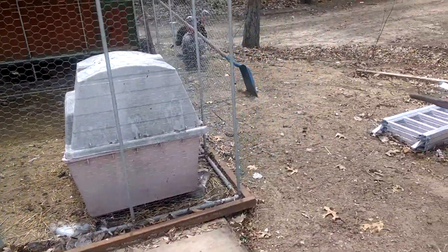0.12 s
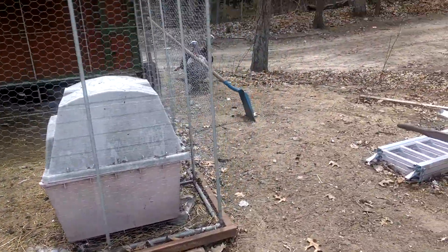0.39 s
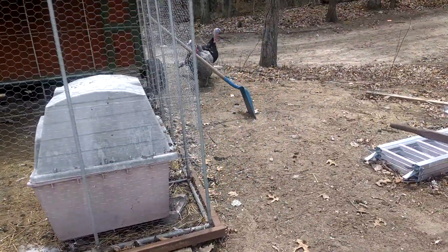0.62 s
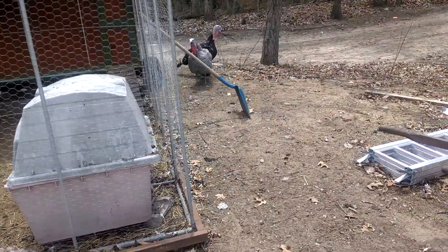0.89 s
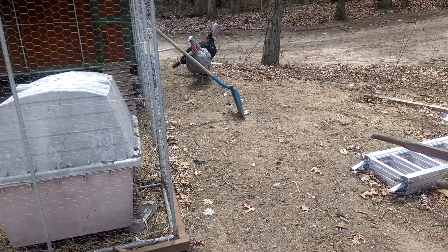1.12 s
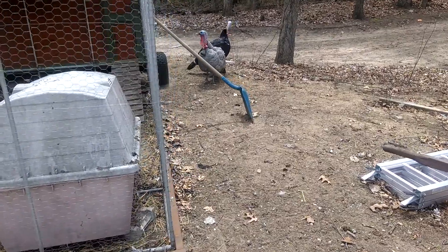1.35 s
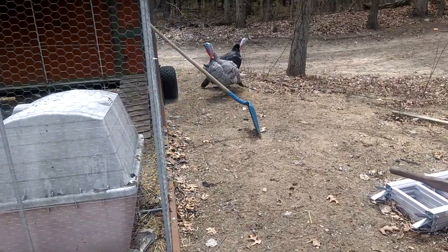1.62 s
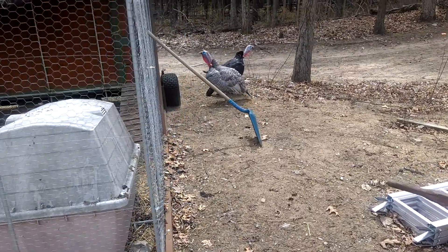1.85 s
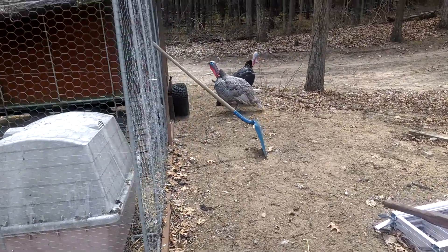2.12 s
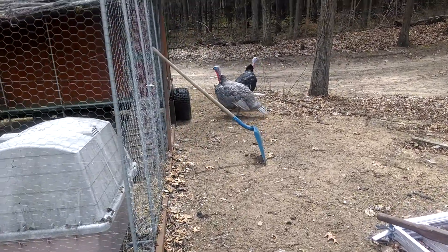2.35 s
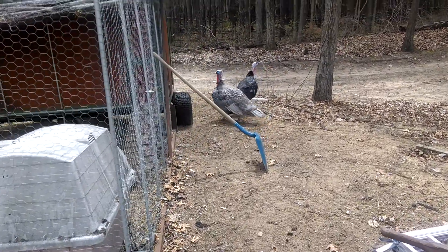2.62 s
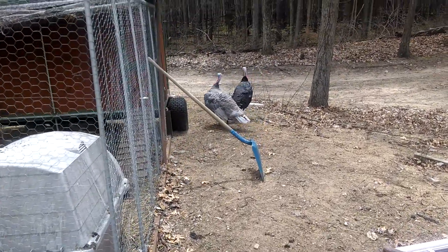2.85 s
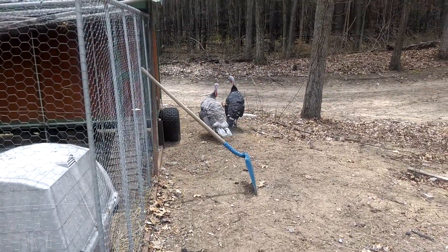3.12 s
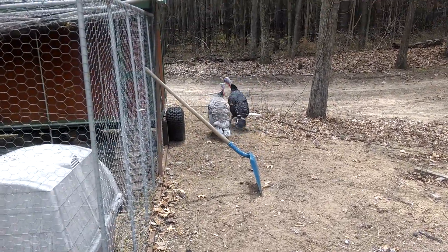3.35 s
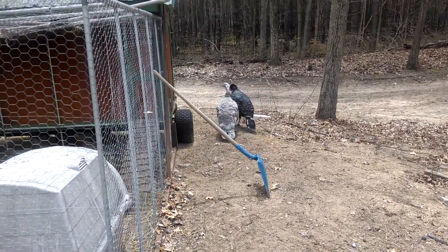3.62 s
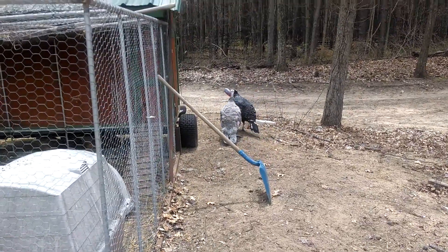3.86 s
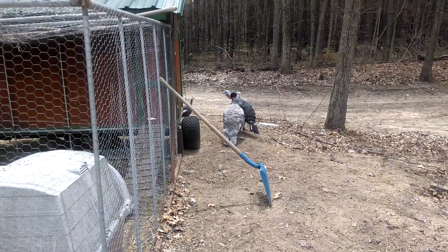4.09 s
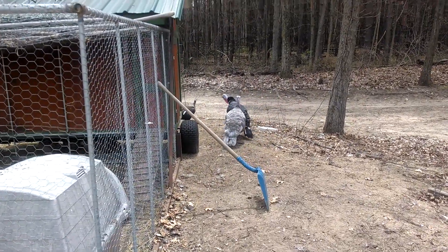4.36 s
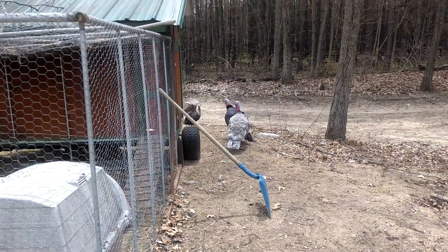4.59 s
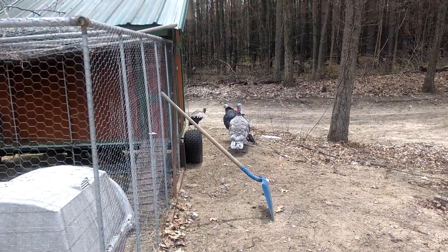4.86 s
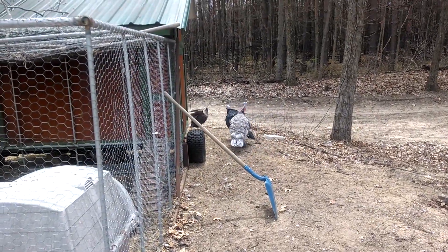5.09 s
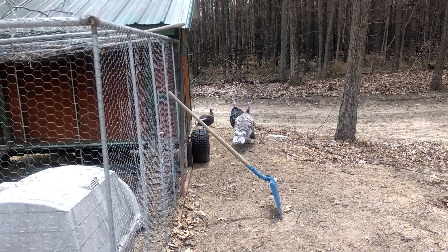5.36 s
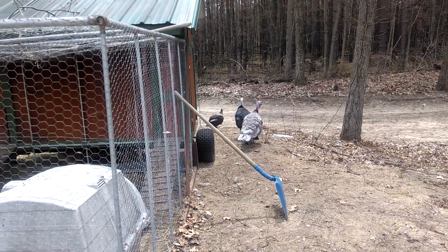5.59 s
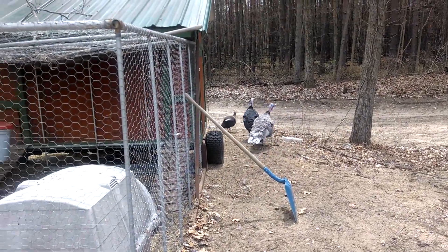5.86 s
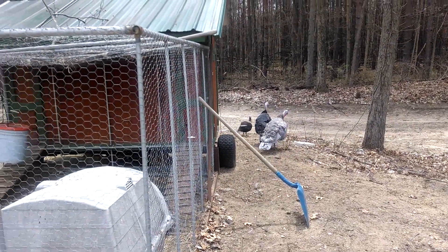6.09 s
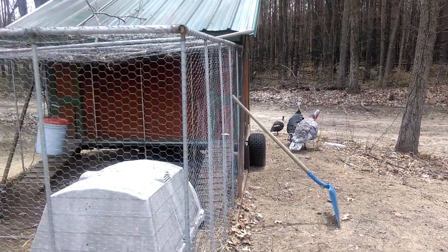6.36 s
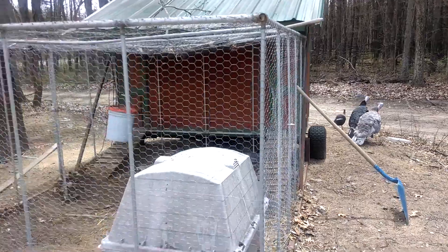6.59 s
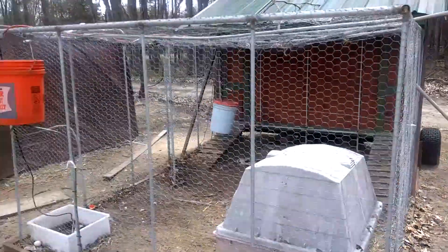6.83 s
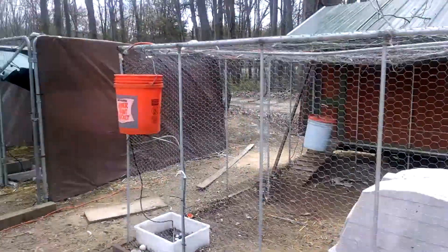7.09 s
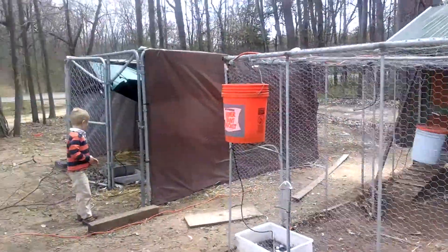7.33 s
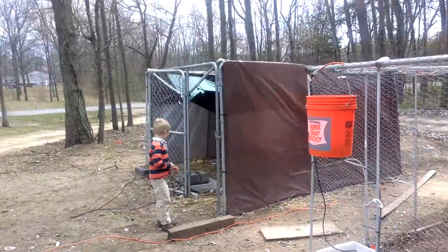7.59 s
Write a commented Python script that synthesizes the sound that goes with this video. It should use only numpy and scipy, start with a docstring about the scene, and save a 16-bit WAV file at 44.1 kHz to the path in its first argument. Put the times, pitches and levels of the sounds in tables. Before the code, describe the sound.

Turkeys burst into rapid, throaty gobbles made of tumbling clucks and rising yelps, repeated with pauses, over soft wind and faint leaf scuffs outdoors.

```python
"""A yard at the edge of a wood, some metres from turkeys, heard through the two microphone ports of a
hand-held camera. Two near birds sing yelps and clucks as gliding overtones with chest tone and breath; a
farther one warbles in quick falling notes. A smaller fowl peeps in falling whistles. Scattered taps echo
the calls. Noise bursts are feet in dry leaves; a treble hiss rustles; low noise is wind on the ports,
single pulses are bumps of air, and a steady bed of coloured noise is the air of the place."""
import sys
import numpy as np
from scipy import signal
from scipy.fft import rfft, irfft, next_fast_len
from scipy.io import wavfile
from scipy.ndimage import uniform_filter1d

SR = 44100
rng = np.random.default_rng(int(sys.argv[2]) if len(sys.argv) > 2 else 0)


def volts_from_db(level):
    """Convert decibel levels to linear amplitude ratios."""
    exponent = np.asarray(level, float) / 20
    return 10 ** exponent


def transcribe(signal):
    """Save signal, clipped to [-1, 1], as a 16-bit WAV file at the path in sys.argv[1]."""
    frames = np.atleast_2d(signal).T
    limited = np.clip(frames, -1, 1)
    pcm = np.round(limited * 32767).astype(np.int16)
    wavfile.write(sys.argv[1], SR, pcm)


N = 340011  # length in samples

# Rising yelps. Each row: start in seconds, length in seconds, effort in dB, first pitch in Hz, last pitch in Hz.
YELP_CALLS = [(0.538, 0.028, -21.5, 626.4, 738.4), (0.575, 0.051, -4.5, 578.2, 878),
              (0.764, 0.094, -7.5, 569.7, 767.5), (1.358, 0.088, -14.5, 564.3, 760),
              (1.678, 0.059, -4, 613, 818), (3.367, 0.04, -21, 654, 771.8), (3.417, 0.11, -10, 573, 776),
              (3.681, 0.06, -15, 585, 705), (3.702, 0.073, -12.5, 530, 755),
              (5.897, 0.031, -7.5, 559.4, 618.6), (5.969, 0.04326, -6, 636.5, 795),
              (6.548, 0.1, -19, 564.7, 603), (5.535, 0.054, -24, 650, 688), (6.636, .055, -8.5, 621.3, 747),
              (6.846, 0.097, -15.5, 568, 753)]
# Clucks that arch over and fall. Each row: start in seconds, length in seconds, effort in dB, top pitch in Hz,
# place of the top as a fraction of the length.
CLUCK_CALLS = [(0.486, 0.038, -14.5, 587, 0.5), (0.622, 0.048, -13, 855, 0.02),
               (0.686, 0.037, -21, 738, 0.39), (0.732, 0.031, -8.5, 771, 0.83),
               (0.901, 0.032, -20.5, 636, 0.35), (0.952, 0.024, -11, 588, 0.37),
               (1.042, 0.064, -19, 705.6, 0.44), (1.112, 0.052, -16.5, 642, 0.32),
               (1.159, 0.014, -11.5, 529, 0.54), (1.331, 0.0298, -4.5, 665.5, .5),
               (1.444, 0.034, -14, 780.4, 0.32), (1.572, 0.069, -15, 592, 0.41),
               (1.655, 0.034, -15, 675, 0.6), (1.828, 0.038, -13, 618, 0.38), (1.861, 0.029, -7, 672, 0.15),
               (1.946, 0.061, -18.5, 710, 0.5), (2.027, 0.027, -18, 679, 0),
               (2.066, 0.058, -15.5, 700, 0.54), (2.126, .028, -19.5, 590, 0.23),
               (2.167, 0.055, -20.5, 690, 0.4), (2.229, 0.027, -15.5, 612.6, 0.22),
               (2.285, 0.063, -6.5, 703.7, 0.45), (2.353, 0.032, -17.5, 670, 0.38),
               (2.406, 0.027, -18.5, 576, 0.3), (3.323, 0.033, -10.5, 668, 0),
               (3.509, 0.039, -4, 814, 0.43), (3.642, 0.052, -17.5, 727, 0.18),
               (3.822, 0.053, -18.5, 688, 0.11), (3.864, 0.044, -16, 675.6, 0.6),
               (3.941, 0.054, -16, 650.5, 0.53), (3.979, 0.043, -21, 684, .05),
               (4.02, 0.036, -20.5, 592, .2), (4.045, 0.0285, -15.5, 644, 0.04),
               (4.077, 0.02536, -15.5, 590, .4), (4.162, 0.063, -18, 678.5, 0.09),
               (4.227, 0.043, -15.5, 636, 0.22), (4.362, 0.0439, -18, 676, 0),
               (4.418, 0.044, -21.5, 554.5, 0.43), (5.493, 0.04, -15.5, 671, 0.12),
               (5.646, 0.028, -22.5, 591.5, 0.09), (5.82, 0.034, -12.5, 633.4, 0.39),
               (6.017, 0.035, -18.5, 783.6, 0.03), (6.061, 0.056, -22.5, 733, 0.46),
               (6.128, 0.038, -17, 720, 0.17), (6.169, 0.035, -16.5, 630.7, 0.14),
               (6.239, .063, -10.5, 721, 0.5), (6.314, .044, -21.5, 613, 0.5),
               (6.376, 0.038, -15.5, 635, 0.36), (6.49, 0.053, -10, 649.4, 0.36),
               (6.691, 0.031, -8, 798, 0.38), (6.742, 0.09, -20, 604.4, 0.34),
               (6.821, 0.03, -14, 685.5, 0.43), (6.935, 0.039, -14, 735.4, 0.02),
               (6.986, 0.067, -21, 580.5, 0.32)]
# Throat resonances. Each row: frequency in Hz, relative level in dB.
THROAT_RESONANCE = [(850, 3), (1150, 5), (1500, -3.5), (1850, -6.5), (2700, -14.5), (3500, -19.5),
                    (6000, -28.5), (9000, -100)]
# Narrow hiss of breath. Each row: frequency in Hz, relative level in dB per Hz.
BREATH_COLOUR = [(2600, -8.5), (3500, -1.5), (5400, -18)]
# Chest tone against the overtones as the birds turn and tire. Each row: time in seconds, level in dB.
CHEST_BALANCE = [(.5, -32.5), (1.6, -8), (2.4, -2), (3.35, -11.5), (4.3, 3.5), (5.9, -13), (6.9, 1)]
# Peeps of a smaller fowl. Each row: start in seconds, length in seconds, whistle in dB, scrape in dB.
PEEP_CALLS = [(0.145, 0.039, -27.5, -40), (0.327, 0.057, -30.5, -37), (1.285, 0.056, -19.5, -25.5),
              (1.498, 0.042, -33, -32), (2.036, 0.045, -13.5, -23.5), (7.129, 0.05, -49, -33.5)]
# Decay of the late echoes. Each row: frequency in Hz, time to fall by 60 dB in seconds.
WOOD_DECAY = [(800, 1.0), (12000, 1)]
# Scuffs in dry leaves. Each row: start in seconds, length in seconds, level in dB, treble against body in dB.
LEAF_SCUFFS = [(4.839, 0.16, -28.5, -13), (5.002, 0.11, -29, -9), (5.096, 0.42, -23, -13.5),
               (5.235, 0.025, -43, 15.5), (5.273, 0.008, -32.5, 21), (5.276, 0.11, -30, 5),
               (5.617, 0.04, -35, 7.5), (5.709, 0.048, -32.5, -1.5), (3.278, 0.069, -32.5, -26)]
# Dry leaves and feathers. Each row: frequency in Hz, relative level in dB per Hz.
CRISP_COLOUR = [(9000, 4), (15000, -1)]
# A long treble rustle. Each row: time in seconds, level in dB.
RUSTLE_LEVEL = [(1.85, -52), (2.1, -37), (2.5, -33.5), (2.7, -41), (3.05, -36), (3.2, -49.5)]
# Its colour. Each row: frequency in Hz, relative level in dB per Hz.
RUSTLE_COLOUR = [(3500, -6.5), (9000, 5.5), (15500, -2)]
# Wind on the ports. Each row: time in seconds, level in dB ahead of the balance between the ports.
GUST_LEVEL = [(.2, -12), (.5, -24.5), (1.95, -16.5), (2.1, -31.5), (2.95, -18.5), (3.17, -12), (3.5, -24),
              (6.0, -19), (6.85, -24.5), (7.07, -14), (7.25, -24)]
# Its rumble. Each row: frequency in Hz, relative level in dB per Hz.
WIND_COLOUR = [(15, -60), (70, 27), (150, 19), (400, -70)]
# Bumps of air on the ports. Each row: centre in seconds, level in dB ahead of the balance between the ports,
# frequency of the spectral peak in Hz.
AIR_BUMPS = [(3.108, -8, 300), (3.195, -16, 607), (7.01, -8, 191), (7.083, -13, 253)]
# Air of the place. Each row: frequency in Hz, relative level in dB per Hz.
AIR_COLOUR = [(400, 17), (1300, 7.5), (3500, -5.5), (6000, -32), (14500, -25)]

# The longer a yelp against LINGER_S, the later it climbs.
LINGER_S, YELP_ATTACK_S, YELP_RELEASE_S = 0.12, 0.01, 0.005826
# Pitch of a cluck below its top: half a cluck before it, and at the end.
LIFT_OCTAVES, FALL_OCTAVES = 0.28, 0.46
# The inflated chest rings when the pitch climbs up to it.
CHEST_HZ, CHEST_WIDTH_HZ, CHEST_RING_DB = 777.5, 31.7, 55
HOARSE_DB = -5  # noise through the throat in soft syllables
# Air forced through the beak hisses at high pitch; RASP_TURN is in dB per dB of chest balance.
RASP_DB, RASP_DB_PER_OCTAVE, RASP_TURN = -30, 34, -0.42
PEEP_HZ, PEEP_SAG_HZ_PER_S = 1575, 3800
AIR_DB = -42.5
PORT_SAMPLES = 17  # delay of the other port


def evened(x):
    """Scales to rms 1."""
    return x / np.sqrt(np.mean(x ** 2) + 1e-20)


def read(points, hz):
    """Reads a spectrum on a log-frequency axis."""
    f, value = np.transpose(points)
    return np.interp(np.log(hz + 1), np.log(f + 1), value)


def curve(rows):
    """Reads a curve at every sample."""
    return np.interp(np.arange(N) / SR, *np.transpose(rows))


def wobble(width):
    """Smooth chance that changes over about width samples, of rms 1 on its coarse grid."""
    step = max(int(width) // 8, 1)
    coarse = rng.standard_normal(N // step + 2)
    coarse = uniform_filter1d(uniform_filter1d(coarse, 8), 8)
    return np.interp(np.arange(N) / step, np.arange(len(coarse)), evened(coarse))


def hump(s, length, rise, lap=0.00167):
    """Where a short sound lies, lapping over at both ends, and its envelope; rise below 1 climbs faster."""
    a, b = max(round((s - lap) * SR), 0), round((s + length + lap) * SR)
    u = np.linspace(0, 1, b - a)
    return slice(a, b), np.sin(np.pi * u ** rise).clip(0)


def at_ports(x, points, alike_hz):
    """Colours two signals; waves longer than the port spacing, well below alike_hz, reach both ports alike."""
    size = next_fast_len(x.shape[1])
    hz = np.fft.rfftfreq(size, 1 / SR)
    a, b = rfft(x, size) * volts_from_db(read(points, hz))
    apart = np.sqrt(0.5 * hz ** 2 / (hz ** 2 + alike_hz ** 2))
    same = np.sqrt(1 - apart ** 2)
    ports = np.array([same * a + apart * b, same * a - apart * b])
    return evened(irfft(ports, size)[:, :x.shape[1]])


def noise(points, alike_hz):
    """Coloured noise at both ports."""
    return at_ports(rng.standard_normal((2, N)), points, alike_hz)


def gobbles():
    """The near birds sing yelps and clucks; a farther one follows softly in quick falling notes."""
    near = voices()
    through = np.cumsum(18 + 4 * wobble(3000)) / SR % 1  # about 18 syllables a second
    along = np.roll(uniform_filter1d(near[0][1] + near[1][1], 5000), 2500)
    far_effort = volts_from_db(-5) * along * np.sin(np.pi * through ** 0.662) ** 2
    far_hz = 720 - 330 * abs(through - 0.2) ** 1.5 + 35 * wobble(2903.6)
    return sum(syrinx(*bird) for bird in near) + syrinx(far_hz, far_effort)


def voices():
    """Pitch and effort of two near birds that take the syllables in turn, so that neighbours may overlap."""
    syllables = [yelp(*row) for row in YELP_CALLS] + [cluck(*row) for row in CLUCK_CALLS]
    syllables.sort(key=lambda one: one[0][0])
    pitch, efforts = np.zeros((2, 2, N))
    for k, (t, hz, effort) in enumerate(syllables):
        at = round(t[0] * SR) + np.arange(len(t))
        pitch[k % 2, at], efforts[k % 2, at] = hz, effort
    # Pitch is bridged across the gaps.
    return [(np.interp(np.arange(N), np.flatnonzero(hz), hz[hz > 0]), effort)
            for hz, effort in zip(pitch, efforts)]


def yelp(s, length, effort_db, first_hz, last_hz):
    """Times, pitch and effort of a yelp: it snaps on, lingers, then climbs."""
    t = np.arange(0, length, 1 / SR)
    climb = (t / length) ** (1 + length / LINGER_S)
    shape = np.clip(np.minimum(t / YELP_ATTACK_S, (length - t) / YELP_RELEASE_S), 0, 1)
    return s + t, first_hz * (last_hz / first_hz) ** climb, volts_from_db(effort_db) * shape


def cluck(s, length, effort_db, top_hz, place):
    """Times, pitch and effort of a cluck: the pitch curls up to its top and falls away."""
    span, shape = hump(s, length, 0.615)
    u = np.linspace(0, 1, len(shape))
    place = np.clip(place, 0, 0.9)
    lift = LIFT_OCTAVES * (2 * (place - u)) ** 2
    fall = FALL_OCTAVES * (abs(u - place) / (1 - place)) ** 1.1
    below = np.where(u < place, lift, fall)
    return np.arange(span.start, span.stop) / SR, top_hz * 2 ** -below, volts_from_db(effort_db) * shape


def syrinx(hz, effort):
    """Overtones shaped by the throat, a chest tone, and grainy breath that hisses at high pitch."""
    climb = np.log2(hz / 650)
    slack = 1 / (1 + (effort / 0.09) ** 2)  # soft syllables are the rough ones
    jitter = (0.004 + 0.035 * slack) * wobble(80) + 0.06 * slack * wobble(500)
    turns = np.cumsum(hz * (1 + jitter)) / SR
    flutter = [volts_from_db((1 + 3 * slack + 0.4 * k) * wobble(450)) for k in range(13)]  # high overtones break up
    # The beak opens with the pitch and wavers, moving the resonances.
    mouth = 2 ** (0.15 * climb) + 0.07 * wobble(1500)
    overtones = sum(volts_from_db(read(THROAT_RESONANCE, k * hz / mouth)) * flutter[k]
                    * np.cos(2 * np.pi * k * turns + k * k) for k in range(2, 13))
    # The chest takes over at the top of a glide.
    ring_db = CHEST_RING_DB * np.exp(-((hz - CHEST_HZ) / CHEST_WIDTH_HZ) ** 2)
    chest = volts_from_db(curve(CHEST_BALANCE) + 11.6 * climb + 10.4 * slack + ring_db)
    chest_tone = chest * flutter[1] * np.cos(2 * np.pi * turns)
    tone = (overtones + chest_tone) / np.sqrt(1 + chest ** 2)
    throb = volts_from_db((1.2 + 1.5 * slack) * wobble(220))  # the wattled throat shakes
    grain_db = 4 * wobble(350)  # the breath comes in spurts
    hoarse = slack * volts_from_db(HOARSE_DB + grain_db) * noise(THROAT_RESONANCE, 1e5)[0]
    hiss = volts_from_db(-20.0 + 12 * climb + grain_db) * noise(BREATH_COLOUR, 1e5)[0]
    return effort * (throb * tone + hoarse + hiss)


def rasps():
    """Air through the beak: spurting bright noise on strong, high syllables, most with strong overtones."""
    push = sum(effort * volts_from_db(RASP_DB_PER_OCTAVE * np.log2(hz / 650)) for hz, effort in voices())
    push = uniform_filter1d(push, 400) * volts_from_db(RASP_DB + RASP_TURN * curve(CHEST_BALANCE))
    spurts = volts_from_db(3.5 * wobble(300))
    return push * spurts * noise(CRISP_COLOUR, 1400)


def peeps():
    """Raspy falling whistles, a fundamental and three overtones, each with a scrape of breath."""
    out = np.zeros(N)
    rasp = 1 + 0.4 * wobble(60)
    scrape = noise(BREATH_COLOUR, 1e5)[0]
    for s, length, db, scrape_db in PEEP_CALLS:
        span, shape = hump(s, length, 1.0)
        t = np.arange(len(shape)) / SR
        turn = 2 * np.pi * np.cumsum(PEEP_HZ - PEEP_SAG_HZ_PER_S * t) / SR
        whistle = sum(volts_from_db(-4.0 * k) * np.sin(k * turn) for k in range(1, 5))
        out[span] += shape * (volts_from_db(db) * rasp[span] * whistle + volts_from_db(scrape_db) * scrape[span])
    return out


def yard(x):
    """Sheds and trunks scatter the calls back: sparse taps decay in each band by the time set for it."""
    taps = np.zeros((2, SR))
    grid = np.arange(200, SR - 20, 20)
    at = grid + rng.integers(0, 20, (2, len(grid)))
    np.put_along_axis(taps, at, rng.choice([-1., 1.], at.shape), 1)
    hz, t, z = signal.stft(taps, SR, nperseg=256)
    far = volts_from_db(-60 * t / read(WOOD_DECAY, hz)[:, None] - 7.5)
    near = volts_from_db(-60 * t / 0.1)  # falls 60 dB in 0.1 s
    scattered = signal.istft(z * (far + near), SR, nperseg=256)[1]
    tail = at_ports(scattered, [(1, 0.0085)], 330)  # flat colour
    return signal.fftconvolve(x[None], tail / np.sqrt(tail.shape[1]), axes=1)[:, :N]


def scuffs():
    """Feet in dry leaves: crackly noise bursts, each with its own share of treble over a duller body."""
    crackle = volts_from_db(2 * wobble(36) + 1.8 * wobble(700))
    low = noise([(500, -10.0), (4500, -19.5), (8000, -50)], 721)
    high = noise(CRISP_COLOUR, 1300)
    out = np.zeros((2, N))
    for s, length, db, treble_db in LEAF_SCUFFS:
        span, shape = hump(s, length, 0.78, lap=0.0029)
        out[:, span] += volts_from_db(db) * shape * (low + volts_from_db(treble_db) * high)[:, span]
    return out * crackle


def rustle():
    """A long treble hiss: bright noise that swells and wavers."""
    return volts_from_db(curve(RUSTLE_LEVEL) + wobble(1200)) * noise(RUSTLE_COLOUR, 1000)


def wind():
    """Lumpy rumble, partly shared by the ports; strong gusts also flutter higher up."""
    gust_db = curve(GUST_LEVEL) + 2 * np.array([wobble(1700), wobble(1000)])
    flutter_gain = volts_from_db(gust_db + 23.0 + 1.05 * wobble(467))
    flutter = flutter_gain * noise([(60, 17.5), (230, -4.5), (900, -60.0)], 224)
    return volts_from_db(gust_db + [[3], [-8]]) * (noise(WIND_COLOUR, 115) + flutter)


def thumps():
    """Single pushes of air: one swing to either side, stronger on the left port."""
    out, t = np.zeros(N), np.arange(-1000, 1000) / SR
    for s, db, top_hz in AIR_BUMPS:
        u = np.pi * top_hz * t
        out[round(s * SR) - 1000:][:2000] += volts_from_db(db) * 2 * u * np.exp(0.5 - 2 * u ** 2)  # unit peak
    return out * volts_from_db([[4], [-10]])


def air():
    """The open air of the place: steady coloured noise whose level drifts slightly."""
    return volts_from_db(AIR_DB + wobble(9760)) * noise(AIR_COLOUR, 760)


def scene():
    """Sound pressure at the two ports; the birds reach the left one a little early and louder."""
    birds = gobbles() + peeps()
    direct = np.array([birds, 0.59 * np.roll(birds, 1)])
    echoes = volts_from_db(-10.5) * yard(birds)
    return direct + echoes + rasps() + scuffs() + rustle() + wind() + thumps() + air()


def roll_off(x):
    """The treble ends steeply here."""
    return signal.sosfilt(signal.butter(12, 15690, fs=SR, output="sos"), x)


def record(dry):
    """Each channel subtracts the other port, delayed, to aim sideways: a comb in the sum. Peaks clip softly."""
    late = np.pad(dry[::-1], ((0, 0), (PORT_SAMPLES, 0)), "edge")[:, :N]
    aimed = (dry - late * [[0.93], [0.82]]) / 2
    aimed = signal.sosfilt(signal.butter(8, 15000, fs=SR, output="sos"), aimed)  # the treble ends
    mix = aimed / (1 + abs(aimed) ** 6) ** (1 / 6)
    return roll_off(mix)


dry = scene()
out = record(dry)
transcribe(out)
```